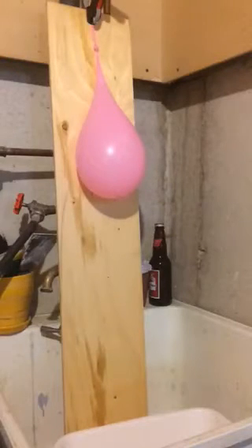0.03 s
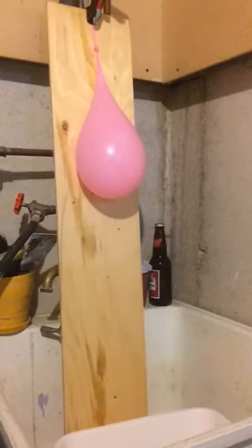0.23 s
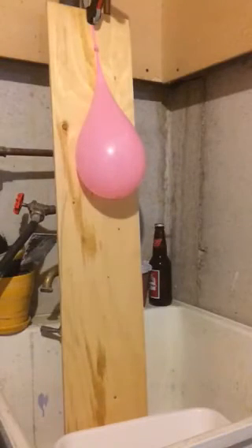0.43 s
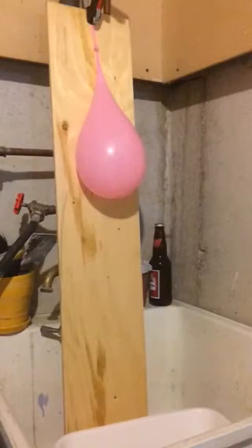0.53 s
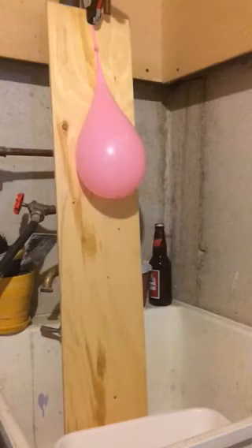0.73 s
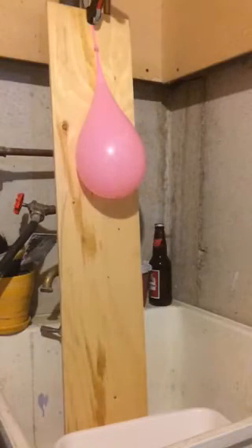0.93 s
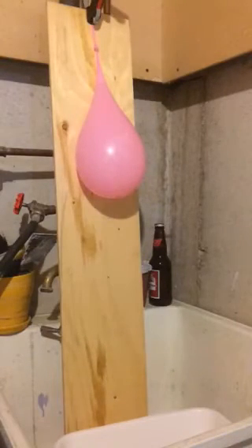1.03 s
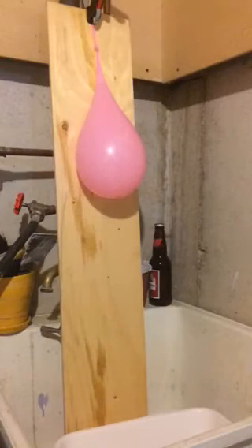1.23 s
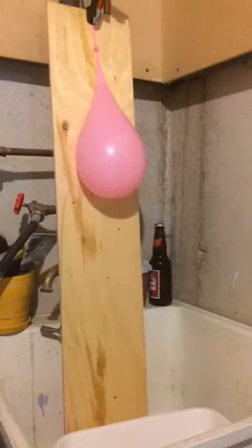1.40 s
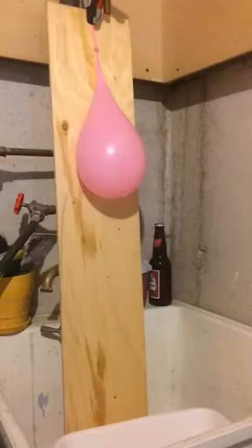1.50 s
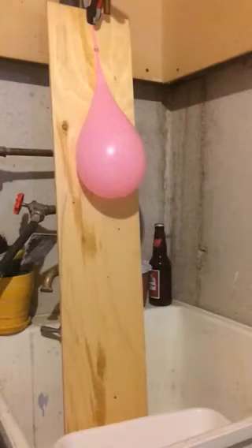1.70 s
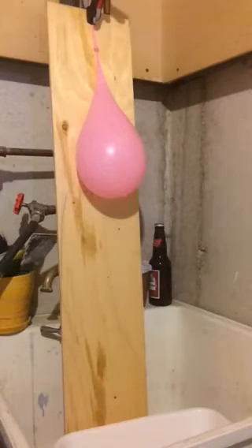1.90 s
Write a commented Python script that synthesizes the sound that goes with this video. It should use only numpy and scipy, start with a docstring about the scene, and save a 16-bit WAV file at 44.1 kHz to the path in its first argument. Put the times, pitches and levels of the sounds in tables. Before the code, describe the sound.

An air gun is cocked and loaded close to the microphone in a concrete basement. Parts slide and snap home in three sharp metallic clacks, followed by a dull bump and faint handling ticks.

```python
"""An air gun is cocked and loaded close to one microphone, in a concrete basement workshop.
Room air and mains hum lie under it from the start. Parts slide under the hand, then snap home in
three loud clacks that ring the steel and knock the stock. The gun settles with a dull bump; after
that come only faint rubbing and handling ticks. A near wall slaps each click back and the room
rings briefly."""
import sys
import numpy as np
from scipy import signal
from scipy.fft import rfft, irfft
from scipy.io import wavfile

SR = 44100
rng = np.random.default_rng(int(sys.argv[2]) if len(sys.argv) > 2 else 0)


def to_wav(s):
    """Save 16-bit WAV."""
    ch = np.atleast_2d(s).T  # columns
    pcm = np.round(np.clip(ch, -1, 1) * 32767)  # PCM
    wavfile.write(sys.argv[1], SR, pcm.astype(np.int16))


N = 85995


def amp(db):
    """Decibels to gain."""
    return 10 ** (np.asarray(db) / 20)


def along(points, hz):
    """Read a curve of (Hz, value) points on a log frequency axis."""
    f, v = np.transpose(points)
    return np.interp(np.log(hz + 1), np.log(f + 1), v)


def norm(x):
    """Scale to energy 1."""
    return x / np.sqrt(np.sum(x ** 2) + 1e-20)


def seconds(length):
    """Sample times over a length in seconds."""
    return np.arange(int(length * SR)) / SR


def fade(t, t60):
    """Exponential decay, 60 dB down after t60 seconds."""
    return np.exp(-np.log(1000) * t / np.maximum(t60, 1e-4))


def add(out, start_s, x):
    """Mix x into out at start_s, cutting what falls outside."""
    i = round(start_s * SR)
    x, i = x[max(0, -i):], max(0, i)
    out[i:i + len(x)] += x[:len(out) - i]


def room_tone():
    """Still basement air and the mains hum of a distant appliance."""
    # spectrum of the air: frequency_hz, density_db
    air_spectrum = [(13, -35), (22, -11.5), (68, -5), (142, -4.5), (246, -6), (306, -13.5), (1140, -23),
                    (2090, -27.5), (2470, -32.5), (6620, -31), (15500, -38)]
    # hum partials: pitch_hz, level_db
    partials = [(59.3, -67.5), (179, -78.5), (247.6, -79.5)]
    air_db, t = -68, np.arange(N) / SR
    colour = amp(along(air_spectrum, np.fft.rfftfreq(N, 1 / SR)))
    air = irfft(rfft(rng.standard_normal(N)) * colour, N)
    hum = sum(amp(db) * np.sqrt(2) * np.sin(2 * np.pi * (hz * t + rng.random())) for hz, db in partials)
    return amp(air_db) * norm(air) * np.sqrt(N) + hum


def gun_body(tint_db, notes, note_q=9.6, size=4096):
    """The gun's response to one contact: four tint levels (thump, knock, zing, fizz, in dB against an untinted
    middle band) and the struck parts' notes (Hz, dB)."""
    # centres of the thump, knock, untinted middle, zing and fizz bands: centre_hz
    bands = [400, 1400, 3800, 6500, 12000]
    # spectrum of a contact: frequency_hz, level_db
    contact = [(40, -37), (130, -23.5), (300, -12), (700, -6), (1300, -2), (2200, 0.5), (4000, 3.5),
               (6500, 0), (9000, -4.5), (12000, -8), (15500, -17)]
    # resonances of the stock: pitch_hz, width_hz, level_db
    stock = [(350, 70, -4), (490, 40, -2), (1300, 250, -10)]
    thump_db, knock_db, zing_db, fizz_db = tint_db[:4]
    f = np.fft.rfftfreq(size, 1 / SR)
    tint = along(list(zip(bands, [thump_db, knock_db, 0, zing_db, fizz_db])), f)
    peaks = list(stock) + [(hz, hz / note_q, db) for hz, db in notes]
    hollow = 1 + sum(amp(db) / (1 + (2 * (f - hz) / width) ** 2) for hz, width, db in peaks)
    cepstrum = irfft(np.log(hollow * amp(along(contact, f) + tint)))
    cepstrum[1:size // 2] *= 2  # minimum phase: nothing rings before the contact
    cepstrum[size // 2 + 1:] = 0
    return norm(irfft(np.exp(rfft(cepstrum))))


def basement(x, echo_db=0):
    """Direct sound, wall slaps, quick scatter off nearby clutter and a short tail."""
    # slaps off the walls: delay_s, level_db
    walls = [(.0058, -5), (.0082, -16.5), (0.0151, -7), (0.0168, -12.5)]
    # decay of the tail: frequency_hz, t60_s
    decay = [(150, .22), (350, 0.08), (600, 0.29), (1400, 0.32), (2400, .32), (4000, 0.3), (7000, 0.29),
             (14000, 0.25)]
    tail_db, scatter_db, scatter_t60_s, build_s = 0.5, 2.5, 0.095, 0.0022
    t = seconds(0.6)
    hz, frame_s, noise = signal.stft(rng.standard_normal(len(t)), SR, nperseg=256)
    tail = signal.istft(noise * fade(frame_s, along(decay, hz)[:, None]), SR)[1][:len(t)]
    scatter = rng.standard_normal(len(t)) * fade(t, scatter_t60_s)
    build = 1 - np.exp(-(t / build_s) ** 2)
    response = amp(tail_db) * norm(tail * build) + amp(scatter_db) * norm(scatter * build)
    for delay_s, db in walls:
        add(response, delay_s, amp([db]))
    response *= amp(echo_db)
    response[0] += 1  # straight path to the microphone
    return signal.fftconvolve(x, response)


def slides():
    """Parts sliding under the hand: friction sends dense tiny slips through the gun's body."""
    # strokes: start_s, length_s, level_db, thump_db, knock_db, zing_db, fizz_db, note_hz, note_db
    strokes = [(-.04, 0.14, -58, 14, 12, -5, -4.5, 1748, 9),
               (0.099, 0.024, -59, 5, 10, -4.5, -3, 1530, -0.5),
               (0.171, 0.093, -55.5, 4.5, 15, -4, -3.5, 1780, 2),
               (0.261, 0.028, -39, 4, 12, 2, 4.5, 1756, 4.5), (.422, 0.083, -60, 7, 7.5, -9, -6, 1690, 8),
               (0.488, .024, -36.5, 5, -3, 20, 17, 1350, -11),
               (.505, .013, -27.5, 1.5, 0.5, -1, 5, 1582, 2), (0.795, 0.03, -49, 7, 3, -18, -31, 1840, 12),
               (0.833, 0.035, -53, 6.5, 15, -27, -8, 2075, 5),
               (1.051, .1, -72.5, 24.5, 17, -3, -3, 1300, -5),
               (1.172, 0.56, -82, 10, 11, -8, -1, 1357, 8.5),
               (1.567, 0.043, -72, 6, 10, -12, -2.5, 1850, 3)]
    slips_per_s, spread_db, fade_s = 2500, 7, 0.0051
    out, t = np.zeros(N), seconds(0.99)
    for start_s, length_s, db, *tint_db, note_hz, note_db in strokes:
        slips = (rng.random(len(t)) < slips_per_s / SR) * rng.choice([-1, 1], len(t))
        slips = slips * amp(spread_db * rng.standard_normal(len(t)))
        envelope = np.clip(np.minimum(t, length_s - t) / fade_s, 0, 1)
        friction = norm(slips) * np.sqrt(len(t)) * envelope
        gun = gun_body(tint_db, [(note_hz, note_db)])
        add(out, start_s, amp(db) * basement(signal.fftconvolve(friction, gun)))
    return out


def chatter(t60, size=4096, passes=2):
    """A burst of micro-contacts with an even spectrum, dying away."""
    envelope = fade(np.arange(size) / SR, t60)
    burst = rng.standard_normal(size) * envelope
    for _ in range(passes):  # flatten the spectrum, then taper the burst again
        spectrum = rfft(burst)
        burst = irfft(spectrum / (np.abs(spectrum) + 1e-12)) * envelope ** 0.25
    return norm(burst)


def handling_ticks():
    """Fingers and loose parts tap lightly on the gun's body."""
    # taps: start_s, level_db, knock_db, treble_db, note_hz, note_db
    taps = [(.103, -35.5, 13, 2, 1100, -4), (0.1087, -27.5, 27, -1, 1060, 2),
            (.208, -36.5, -10, 22, 1400, 0), (.422, -23, 3, -12, 1590, 9), (1.081, -52.5, -3, -5, 2410, 0),
            (1.106, -34.5, 3, -7.5, 1230, 12), (1.209, -47.5, 6, 1, 1400, 2.5),
            (1.2553, -37.5, 27, -6.5, 1420, 8), (1.31, -46, 19, -8, 1415, -10),
            (1.425, -40.5, 14.5, -5.5, 1000, 7.5), (1.519, -48.5, 7, -1.5, 2200, 3.5),
            (1.545, -47.5, 10, 3.5, 1400, 4.5), (1.601, -39, 7, -6.5, 1850, 8.5),
            (1.678, -47.5, 1, -3, 2100, 1.5), (1.79, -49, 5, -3.5, 2205, 2)]
    out = np.zeros(N)
    for start_s, db, knock_db, treble_db, note_hz, note_db in taps:
        gun = gun_body([knock_db / 2, knock_db, treble_db, treble_db], [(note_hz, note_db)])
        add(out, start_s, amp(db) * basement(signal.fftconvolve(chatter(t60=0.006), gun)))
    return out


def steel_ring(cluster=5, split_hz=45):
    """The struck steel action: each mode is a small beating cluster, drawn anew for every blow."""
    # modes of the action: pitch_hz, level_db, t60_s
    modes = [(2830, -10.5, 0.067), (2795, -8.5, .2), (2936, -5, 0.31), (3490, -3.5, 0.13),
             (3740, -4.5, 0.35), (3984, -6, .28), (4220, -1.5, 0.22), (4260, -7, 0.21), (4830, -4, .27),
             (6870, -4.5, 0.17), (6930, -8.5, 0.31)]
    t = seconds(0.5)
    ring = np.zeros(len(t))
    for hz, db, t60 in modes:
        for _ in range(cluster):
            envelope = amp(db + rng.normal(0, 1.5)) * fade(t, t60)
            pitch_hz = rng.normal(hz, split_hz)
            ring += envelope * np.sin(2 * np.pi * (pitch_hz * t + rng.random()))
    return ring / np.sqrt(cluster)


def clacks():
    """Latch and bolt snap home: chattering cracks through the body, with the steel ringing on."""
    # hard contacts: start_s, level_db, chatter_t60_s, thump_db, knock_db, zing_db, fizz_db,
    # note_hz, note_db (hollow), clang_hz, clang_db (metallic), ring_db, echo_db
    contacts = [(0.1623, -16, 0.0093, 7.5, 10.5, -1, -6.5, 1218, 15, 3450, 4, -55, -1.5),
                (0.2455, -3.5, 0.00065, -9, 2, -2, -4.5, 986, 10.5, 2220, -1, -53.5, -1.5),
                (.2897, -1.5, 0.0025, -14.5, -8.5, 2, 4.5, 1230, 4.5, 3000, 0, -47, 3),
                (0.2955, 5, 0.0022, -13.5, -12.5, 1.5, -1.5, 1203, 10.5, 4130, -4, -45.5, -3.5),
                (0.4906, -5, 0.014, 0, 14.5, 1, 2, 1302, 9.5, 1830, 2, -51.5, 2.5),
                (0.5036, -7.5, 0.0013, 15.5, 3, 4.5, 2.5, 1270, 7, 732, 1.5, -55, -0.5),
                (0.5146, 0, 0.0099, 4, 2.5, 9.5, 3, 1600, 5, 2400, 1.5, -50, 1.5),
                (0.5204, 1, 0.014, 4, 0.5, 4, 4, 471, 14, 5250, -4.5, -54.5, -2),
                (0.7206, -25, 0.0074, 3.5, 0.5, -7, 7, 1270, -3, 2100, 0, -55, 8.5),
                (.7240, -2, 0.013, 6, 8, 8.5, -3.5, 1258, 13, 3675, 11.5, -59, -4),
                (.7290, -1.5, 0.0104, 3.5, 7, 9, -3.5, 1435, 9, 5350, 5, -58, -5.5),
                (0.8274, -14, 0.014, 5.5, 8, -18, -19, 1950, 1, 2480, 4.5, -58, -5)]
    out = np.zeros(N)
    for start_s, db, t60, *tint_db, note_hz, note_db, clang_hz, clang_db, ring_db, echo_db in contacts:
        blow = amp(ring_db) * steel_ring()
        add(blow, 0, chatter(t60))
        gun = gun_body(tint_db, [(note_hz, note_db), (clang_hz, clang_db)])
        add(out, start_s, amp(db) * basement(signal.fftconvolve(blow, gun), echo_db))
    return out


def settling_bump(start_s=0.828, pitch_hz=171.3, gain_db=-47, rise_s=0.0049, t60_s=0.11):
    """One low, damped note as the gun settles."""
    out, t = np.zeros(N), seconds(0.5)
    envelope = (1 - np.exp(-t / rise_s)) * fade(t, t60_s)
    add(out, start_s, amp(gain_db) * envelope * np.sin(2 * np.pi * pitch_hz * t))
    return out


def scene():
    """The gun and the basement at one close microphone."""
    return (clacks() + slides() + handling_ticks() + settling_bump() + room_tone())[None]


def record(dry):
    """The recorder cuts off steeply above its band limit."""
    top_hz = 15500
    return signal.sosfilt(signal.ellip(14, 0.1, 70, top_hz, fs=SR, output="sos"), dry)


dry = scene()
out = record(dry)
to_wav(out)
```